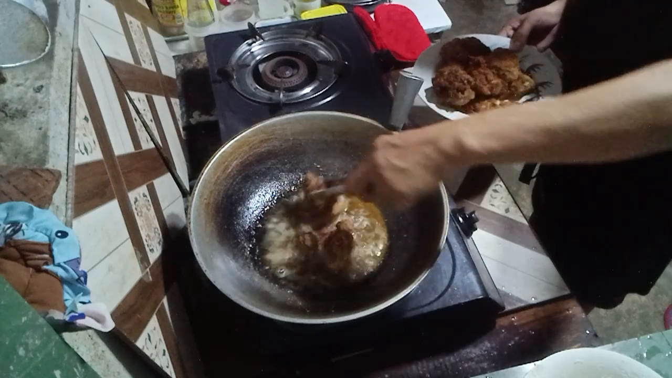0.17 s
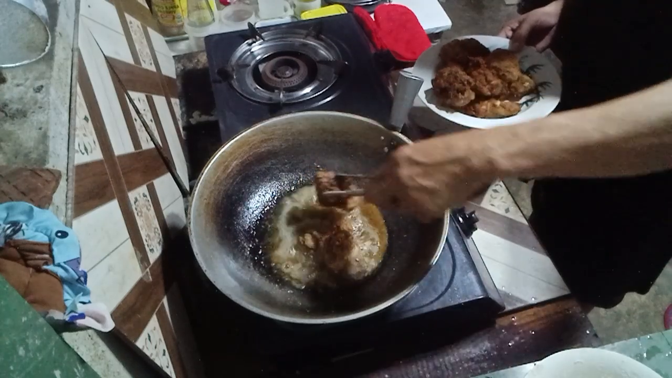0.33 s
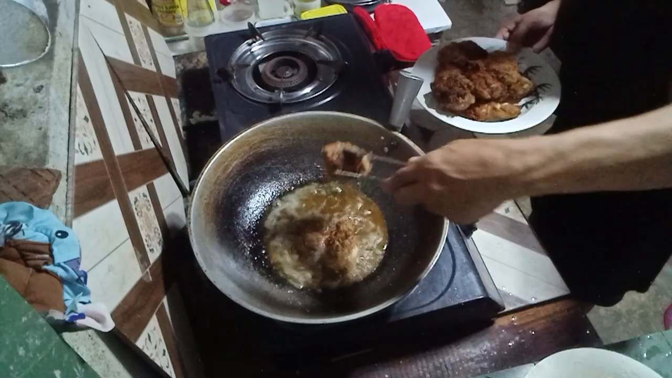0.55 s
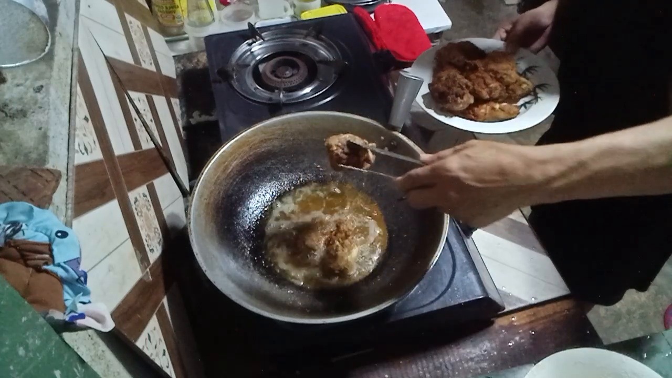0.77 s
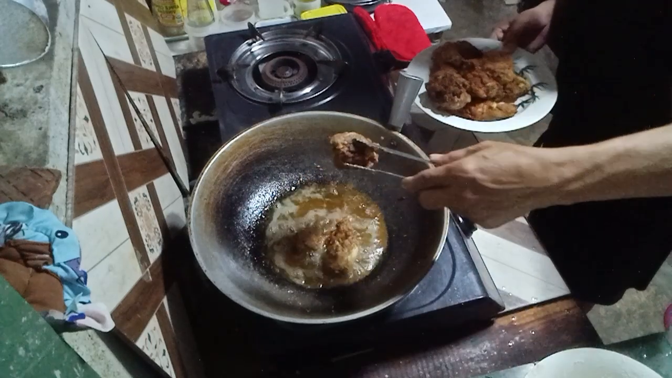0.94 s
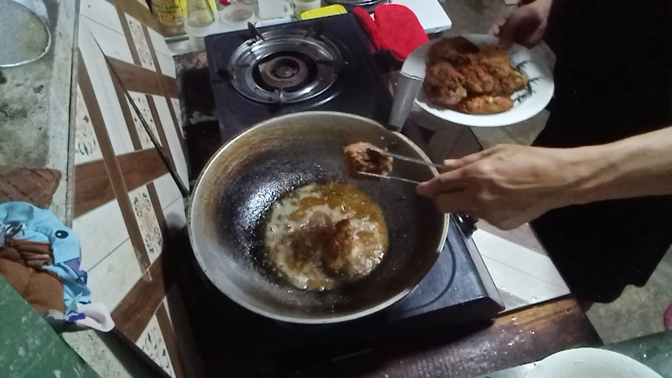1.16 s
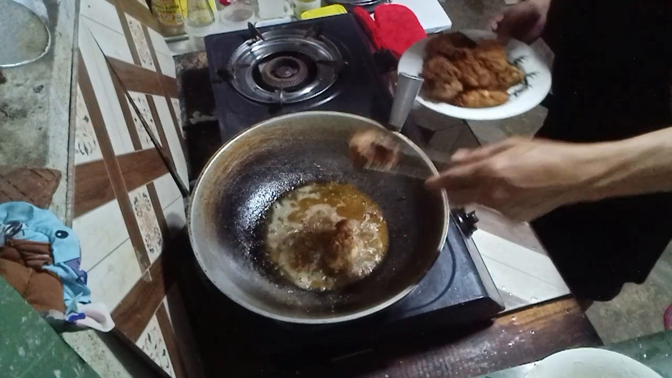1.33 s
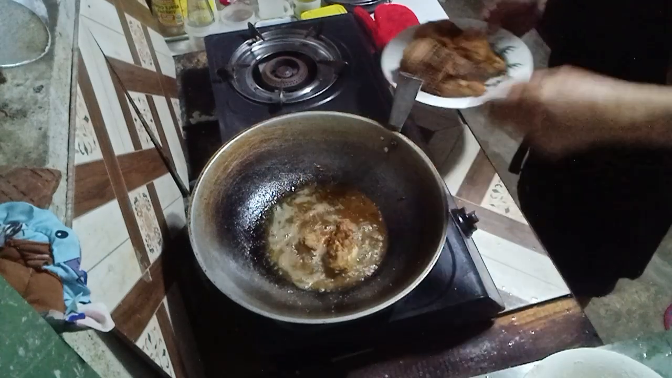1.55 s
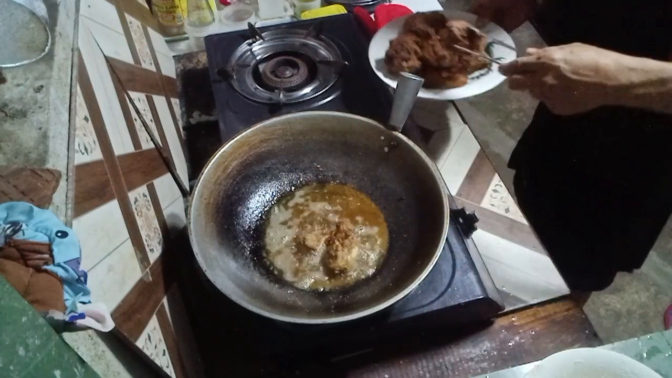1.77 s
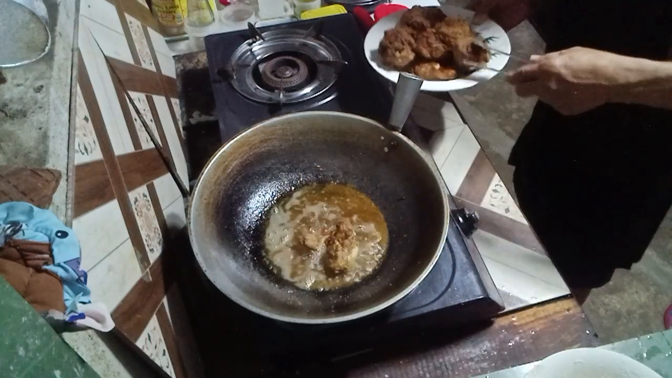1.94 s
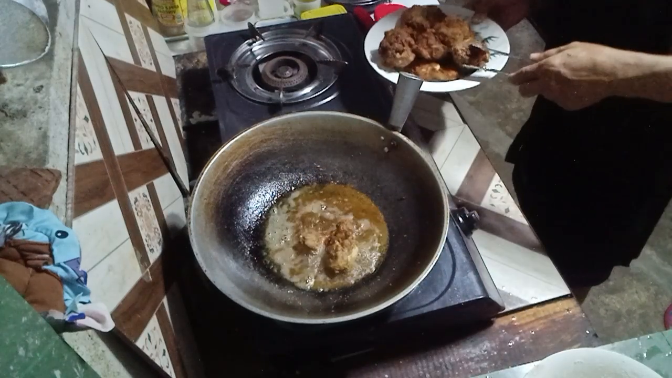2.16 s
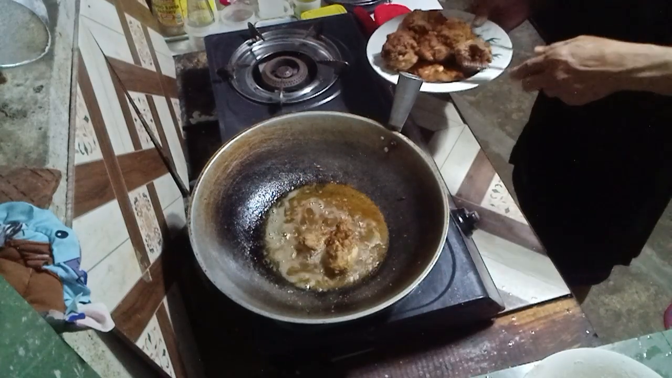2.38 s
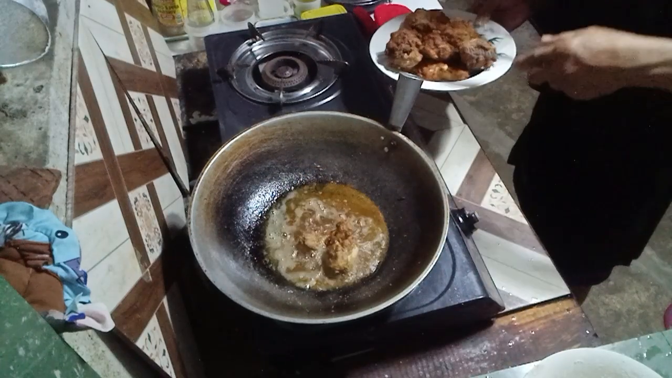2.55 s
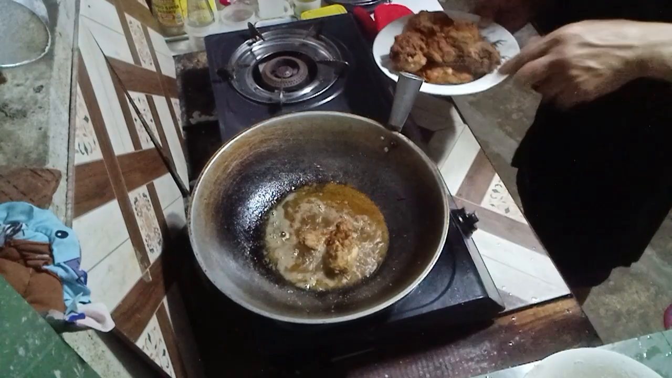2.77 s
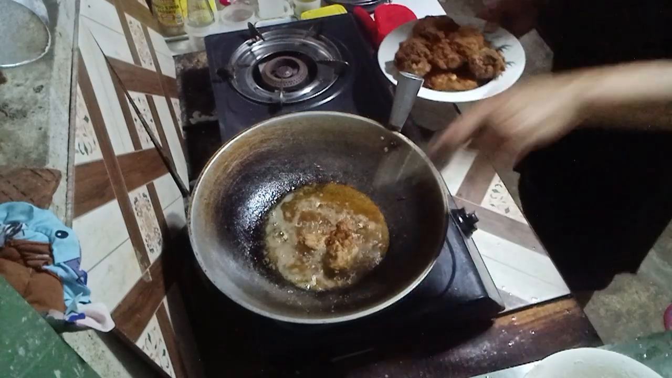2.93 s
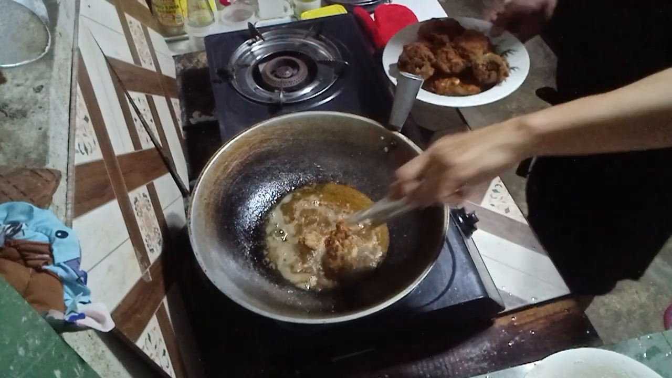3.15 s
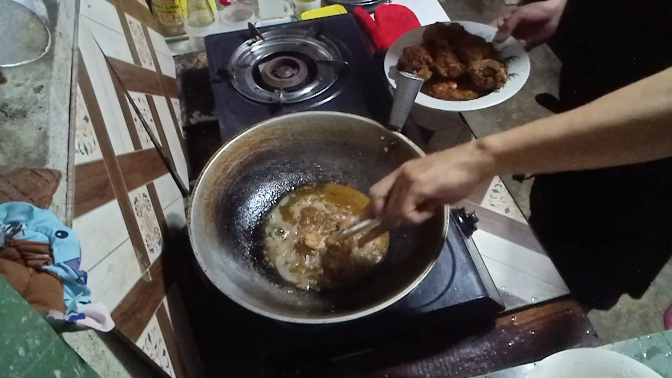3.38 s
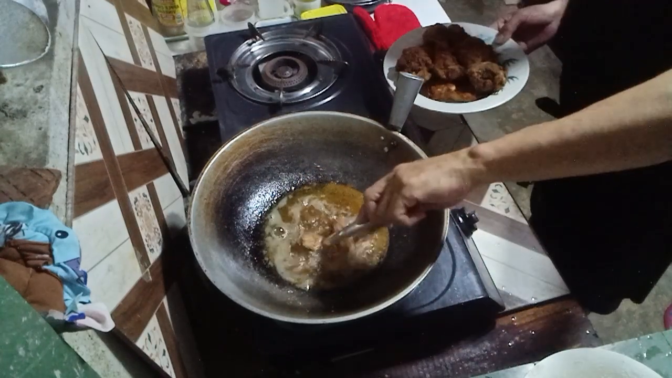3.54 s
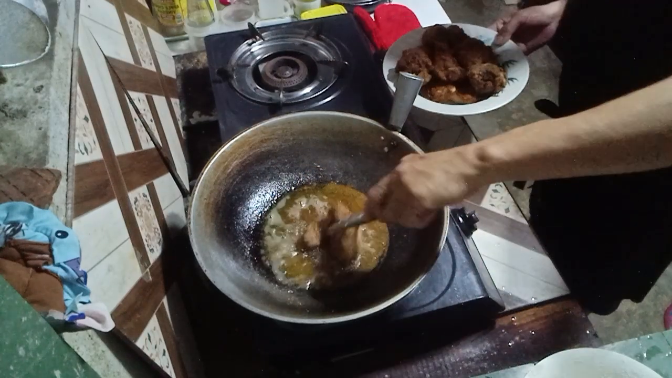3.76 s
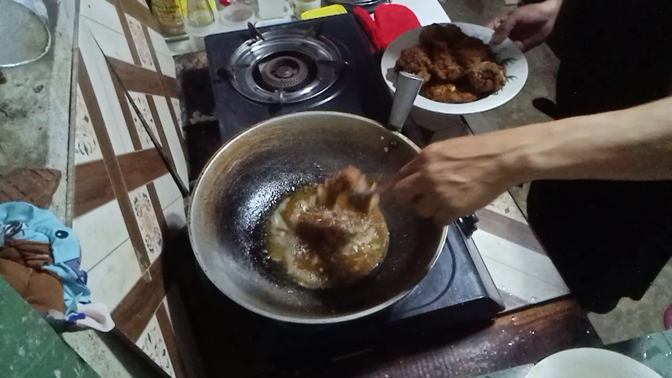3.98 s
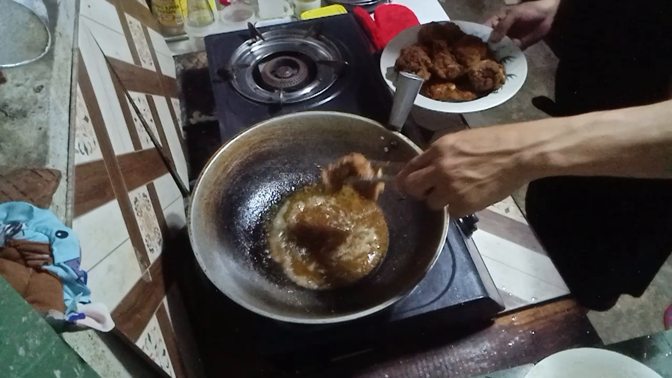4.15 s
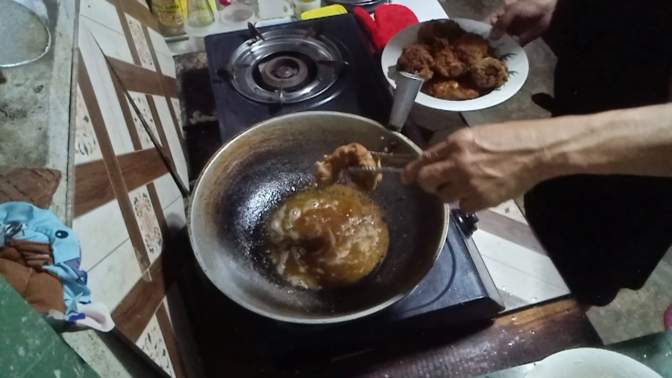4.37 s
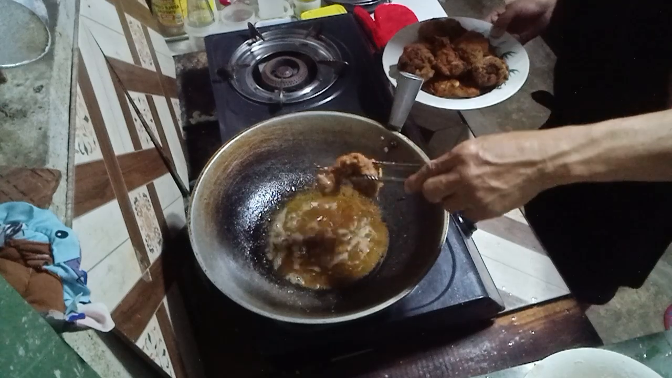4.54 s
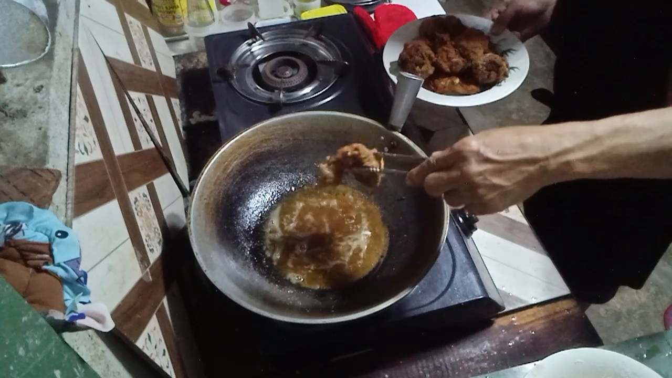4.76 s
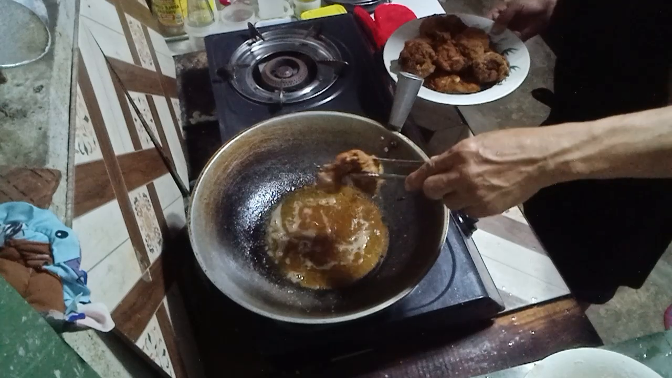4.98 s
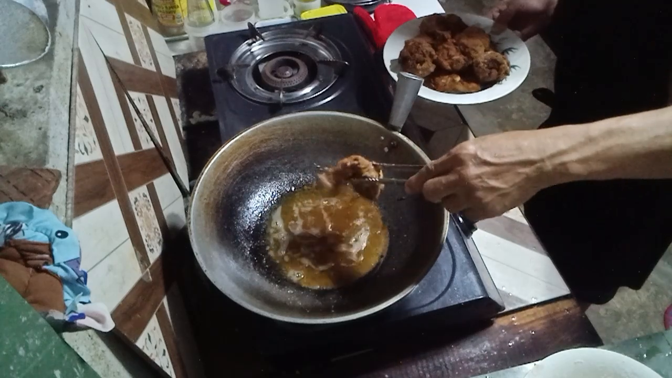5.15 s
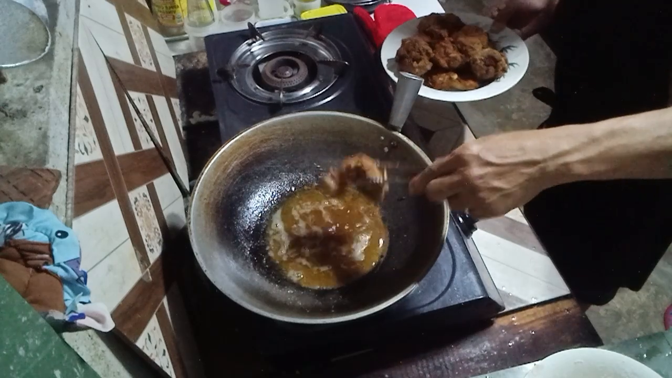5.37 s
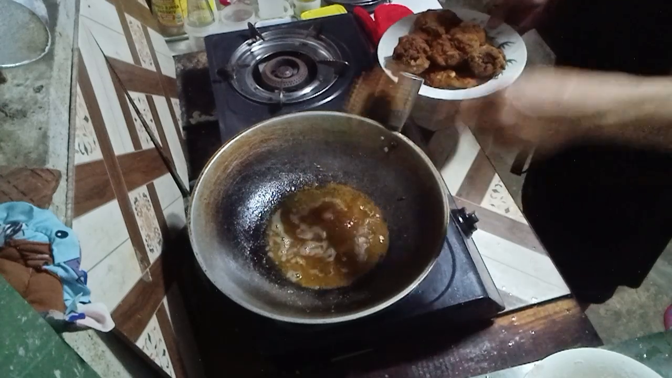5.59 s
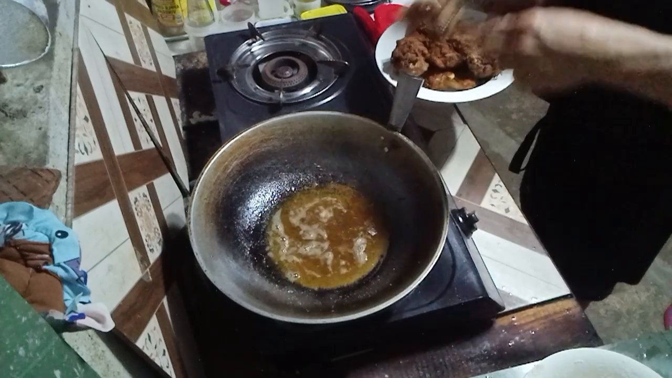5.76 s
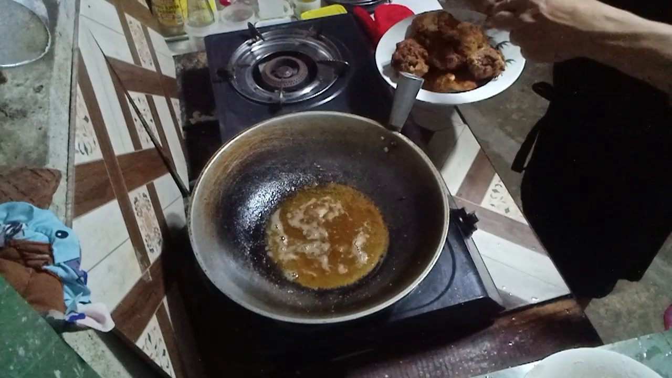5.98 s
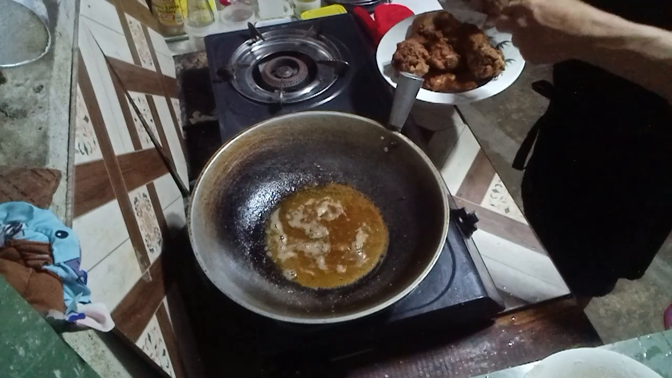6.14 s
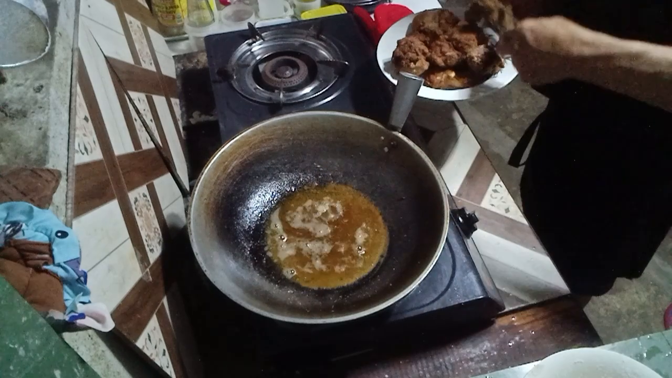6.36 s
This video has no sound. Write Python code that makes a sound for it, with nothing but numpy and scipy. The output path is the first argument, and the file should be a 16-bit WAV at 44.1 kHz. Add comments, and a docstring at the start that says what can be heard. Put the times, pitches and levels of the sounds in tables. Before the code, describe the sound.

From 0 to 0.4 seconds, chicken fries loudly in a wok of hot oil: a dense, bright sizzle with overlapping bursts of sputtering steam. It drops by about 0.6 and keeps easing to 1.5, dotted with ringing bubble pops, high droplet cracks and tiny low gurgles. From 1.5 to 3.4 it holds at a moderate sizzle, with a bubbling surge and steam spurts near 1.9 and a sharp spit near 2.9. At 3.6 to 4.0 it flares again, with hissing, whistling steam and a strong boil. It then fades, with a small gurgle and pops near 4.7 and a cluster of fine crackles from 5.2 to 5.8. By 5.9 only thin fizz and sparse ticks remain until 6.4. A soft, fluttering burner rumble continues beneath. The kitchen echoes very briefly; one close microphone adds faint high hiss, identical in both channels.

```python
"""A dense, bright sizzle of chicken frying in a wok of hot oil; it fades as tongs lift the pieces out one by one.
Small and middling steam bubbles ring as noise-like swarms, and pockets of steam vent and whistle.
Larger bubbles pop, boil and gurgle as ringing sines, and droplets spit with a sharp crack.
The wok and the kitchen echo briefly; the burner rumbles below as low noise.
One microphone, with a faint steady noise of its own at the very top, feeds both channels."""
import sys
import numpy as np
from scipy import signal
from scipy.fft import rfft, irfft, next_fast_len
from scipy.io import wavfile

SR = 44100
rng = np.random.default_rng(int(sys.argv[2]) if len(sys.argv) > 2 else 0)


def dump(signal):
    """Clip the signal to [-1, 1] and save it as 16-bit WAV at the path in sys.argv[1]."""
    limited = np.clip(np.atleast_2d(signal).T, -1, 1)
    pcm = np.round(limited * 32767).astype(np.int16)
    wavfile.write(sys.argv[1], SR, pcm)


N = 283077   # length in samples

# All source levels below are set before the echoes and the microphone's response.


def scene():
    """Mixes the frying with its echoes; gurgles, burner and microphone noise join without echoes."""
    fizz_db, sizzle_db = frying_levels()
    crust = wok(sizzle(sizzle_db) + vents(sizzle_db))
    frying = fizz(fizz_db) + crust + boil(sizzle_db) + pops() + spits(fizz_db)
    mono = kitchen(frying) + gurgles() + burner() + mic_hiss()
    return np.stack([mono, mono])


# How strongly the pan fries over time: t/s, small-bubble fizz level/dB, mid-bubble sizzle level/dB
FRYING_LEVELS = [(0.0, -18.5, -16.5), (0.21, -20.5, -16.5), (0.43, -18, -20.5), (0.57, -21, -22.5),
                 (1.5, -24, -26), (1.88, -23.5, -25), (3.09, -24.5, -26), (3.56, -26.5, -26.5),
                 (3.7, -24.5, -20), (3.91, -29, -19.5), (3.95, -24, -22.5), (4.08, -23.5, -22),
                 (4.3, -26.5, -27), (4.63, -28.5, -28), (4.72, -28.5, -28.5), (4.88, -29, -34.5),
                 (5.3, -35.5, -34), (5.36, -34.5, -32), (5.54, -34.5, -41), (5.58, -31, -33),
                 (5.9, -39.5, -35.5), (6.42, -39, -39.5)]


def frying_levels():
    """The strength of the frying: straight lines in dB between the table's moments."""
    return in_time(FRYING_LEVELS)


# Tone outline of the small bubbles: f/Hz, relative level/dB
FIZZ_TONE = [(2650, -42), (4500, -6), (5300, -5.5), (6600, -4.5), (8340, 1.5), (9300, -3), (12000, -12.5),
             (16000, -14.5)]


def fizz(fizz_db):
    """Small steam bubbles ring high and so often that they blur into a fizz."""
    swarm = bubbles(FIZZ_TONE, (4500, 17000), per_s=9000, spread_db=2.5, cycles=19.7, patchy_db=1.0)
    return from_db(fizz_db) * swarm


# Tone outline of the middling bubbles: f/Hz, relative level/dB
SIZZLE_TONE = [(590, -15.5), (1000, -10.5), (1190, -7.5), (1260, -7), (1350, -7), (1670, 0), (2420, -0.5),
               (2810, -1), (3040, 0.5), (3580, -1), (3920, 3.5), (4350, -3.5), (5200, -9), (6760, 4),
               (11400, -120)]


def sizzle(sizzle_db):
    """Middling steam bubbles are fewer and ring lower than the fizz."""
    swarm = bubbles(SIZZLE_TONE, (1000, 5400), per_s=6000, spread_db=3.0, cycles=11.0, patchy_db=1.0)
    return from_db(sizzle_db) * swarm


def bubbles(tone, span_hz, per_s, spread_db, cycles, patchy_db, count=20):
    """Random uneven bursts; each bubble size rings at its own pitch; neighbouring sizes swell partly together."""
    sizes = from_db(spread_db * np.minimum(rng.exponential(1, N), 5)) * rng.choice([-1, 1], N)
    together = .3 * drift(20)
    chance, dealt = rng.random(N), rng.integers(0, count, N)
    swarms = [drift(18.5) for k in range(count + 1)]
    out = 0
    for k, hz in enumerate(np.geomspace(*span_hz, count)):
        # Neighbouring sizes share one drift, and all sizes share the weaker common one.
        swarm = from_db(patchy_db * (together + swarms[k] + swarms[k + 1]))
        bursts = sizes * (chance < per_s / SR) * (dealt == k)
        rung = rms_one(ring(bursts, hz, cycles / hz))   # rings die away by 60 dB in this many cycles
        out = out + swarm * rung * np.sqrt(hz)          # wider bands up high carry more power
    return rms_one(colour(out, tone))


# Loudest steam pockets venting through the crust: t/s, level/dB (rms before opening and closing), f/Hz, length/s
LOUD_VENTS = [(0.065, -22.5, 1810, 0.046), (0.098, -19, 1590, 0.066), (0.116, -17, 2060, 0.03),
              (0.15, -19.5, 1550, 0.052), (0.209, -21.5, 1570, 0.058), (0.167, -19, 3600, 0.048),
              (0.268, -18.5, 2430, 0.084), (0.608, -30.5, 1790, 0.073), (0.638, -28.5, 1270, 0.041),
              (0.669, -20.5, 3680, 0.056), (0.788, -22.5, 3870, 0.049), (1.151, -27, 1750, 0.031),
              (1.312, -22, 3720, 0.033), (1.336, -27, 1660, 0.062), (1.414, -24.5, 2830, 0.063),
              (1.56, -25, 3070, 0.058), (1.925, -23, 1820, 0.091), (1.927, -18, 2640, 0.04),
              (1.96, -19.5, 1800, 0.046), (2.051, -22.5, 1740, 0.049), (2.332, -25, 2800, 0.045),
              (2.599, -20.5, 1820, 0.049), (2.635, -19, 2900, 0.045), (2.809, -25, 3380, 0.086),
              (2.943, -29, 3850, 0.04), (3.055, -31, 3870, 0.065), (3.165, -31, 3980, 0.044),
              (3.285, -26, 2710, 0.046), (3.4, -22.5, 2800, 0.035), (3.48, -31, 3900, 0.035),
              (3.593, -24, 1960, 0.1), (3.664, -18, 3260, 0.089), (3.674, -24, 1750, 0.063),
              (3.7, -19, 2300, 0.065), (3.705, -20, 3950, 0.1), (3.782, -21, 3830, 0.159),
              (3.788, -18, 3370, 0.07), (3.895, -18.5, 3160, 0.056), (3.975, -24, 2400, 0.055),
              (4.025, -25, 3040, 0.13), (4.029, -26, 1330, 0.059), (4.047, -28, 1670, 0.05),
              (4.177, -18, 3080, 0.033), (4.266, -27.5, 2980, 0.079), (4.406, -23, 3000, 0.033),
              (4.436, -28, 4000, 0.056), (4.641, -21.5, 1670, 0.044), (4.667, -33, 1430, 0.055),
              (4.694, -27.5, 3800, 0.06), (4.757, -26, 3990, 0.083), (4.88, -27.5, 1850, 0.062),
              (5.12, -32, 1720, 0.038), (5.169, -30.5, 2940, 0.048), (5.205, -30, 4300, 0.052),
              (5.341, -29.5, 4100, 0.046), (5.369, -32, 1940, 0.051), (5.431, -30.5, 1680, 0.07),
              (5.557, -29.5, 1500, 0.044), (5.558, -31.5, 4000, 0.045), (5.561, -35, 4730, 0.06),
              (5.622, -31, 1780, 0.059), (5.649, -31.5, 2830, 0.04), (5.745, -38, 4260, 0.035),
              (6.026, -35, 5320, 0.035), (6.134, -33.5, 5930, 0.05), (6.295, -34.5, 3980, 0.035),
              (6.299, -28, 2860, 0.022), (6.344, -40, 1370, 0.072), (6.388, -34.5, 1970, 0.038)]
# Narrow cracks whistling, with the same columns: t/s, level/dB, f/Hz, length/s
WHISTLES_OF_STEAM = [(1.093, -24.5, 3960, 0.082), (2.24, -25.5, 3970, 0.092), (3.06, -32, 1280, 0.062),
                     (3.827, -21.5, 2350, 0.125), (3.84, -27.5, 1730, 0.11), (5.912, -32.5, 4570, 0.11),
                     (5.934, -40, 3950, 0.085), (6.19, -38, 4750, 0.045)]
WHISTLE_WIDTH_HZ = 200
VENT_WIDTH_HZ, VENT_USUAL_HZ, VENT_USUAL_S = 505, 2500, 0.051   # resonance width at usual pitch and length
NARROWING, WIDENING = 0.52, 0.53   # longer pockets whistle more purely; higher ones are broader
SMALL_VENTS, SMALL_VENT_DB = 40, -4   # how many at random; middle level against the sizzle
SMALL_VENT_HZ, SMALL_VENT_S = (1404, 4950), (.025, 0.063)   # ranges of pitch and length


def vents(sizzle_db):
    """A steam pocket tears open and sputters at its cavity's pitch until it closes; small ones come at random."""
    s, db, pitch, size = scattered(sizzle_db + SMALL_VENT_DB, count=SMALL_VENTS)
    (low_hz, high_hz), (short, long) = SMALL_VENT_HZ, SMALL_VENT_S
    small = zip(s, db, low_hz * (high_hz / low_hz) ** pitch, short + (long - short) * size)
    pockets = list(small) + list(LOUD_VENTS)
    widths_hz = [VENT_WIDTH_HZ * (VENT_USUAL_S / length) ** NARROWING * (hz / VENT_USUAL_HZ) ** WIDENING
                 for s, db, hz, length in pockets]
    widths_hz += [WHISTLE_WIDTH_HZ] * len(WHISTLES_OF_STEAM)
    events = pockets + list(WHISTLES_OF_STEAM)
    out, t = np.zeros(N), np.arange(round(.2 * SR)) / SR
    noises = rng.standard_normal((len(events), len(t)))
    spurts = rng.exponential(1, (len(events), len(t)))
    for (s, db, hz, length), width_hz, noise, spurt in zip(events, widths_hz, noises, spurts):
        opening = np.clip(t / 0.0022, 0, 1) * np.exp(-t / 0.21)
        closing = np.clip((length - t) / 0.029, 0, 1)
        t60 = np.log(1000) / (np.pi * width_hz)      # a narrower resonance rings longer
        steam = noise * from_db(3.0 * spurt)         # steam comes in uneven spurts
        hiss = ring(ring(steam, hz, t60), hz, t60)
        add(out, s, from_db(db) * rms_one(hiss) * opening * closing)
    return out


# Modes of the wok that colour the sizzle: f/Hz, width/Hz, lift level/dB (negative is a cut)
WOK_MODES = [(1272, 63, 5.5), (1439, 36, 3), (1550, 51, 2.5), (1666, 41, 1), (1810, 34, 1), (2357, 40, 1.5),
             (2940, 27, -1), (3260, 21, -5.5), (3500, 22, -13), (3660, 35, 0), (3720, 60, -2.5),
             (4793, 61, 5)]


def wok(x):
    """Each mode of the steel bowl lifts or weakens a narrow band."""
    for hz, width_hz, lift_db in WOK_MODES:
        r, w = np.exp(-np.pi * width_hz / SR), 2 * np.pi * hz / SR
        top, bottom = [(1 - r * r) / 2, 0, (r * r - 1) / 2], [1, -2 * r * np.cos(w), r * r]
        x = x + (from_db(lift_db) - 1) * signal.lfilter(top, bottom, x)
    return x


# Loudest large bubbles bursting: t/s, ring level/dB, f/Hz
LOUD_POPS = [(0.0964, -23, 1550), (0.517, -3, 3760), (0.659, -10, 3820), (0.9921, -2, 4870),
             (1.2938, -6.5, 2610), (1.4462, -12, 2890), (1.5465, -15, 2410), (1.571, -8, 3020),
             (1.6489, -10, 1790), (1.7688, -7, 1720), (1.924, -6, 1700), (2.182, -22, 1880),
             (2.3256, -2.5, 3970), (2.6409, -12, 2870), (3.3535, -9, 2350), (3.4015, -9, 2860),
             (3.49, -4.5, 3900), (3.871, -6, 2350), (3.9025, -4, 3200), (3.9774, -8, 2400),
             (4.6464, -5, 1800), (4.6715, -14, 1660), (4.8843, -14, 1950), (5.208, -9, 3870),
             (5.3453, -16, 4200), (5.3697, -15, 1930), (5.4277, -14, 1550), (5.626, -31, 1600),
             (5.9284, -13, 4450)]


def pops():
    """A large bubble bursts and rings briefly at its own pitch."""
    return clicks(LOUD_POPS, cycles=11)


# Loudest droplets spitting: t/s, ring level/dB
LOUD_SPITS = [(1.4748, -12), (1.8878, -5), (2.008, -13), (2.2475, -10), (2.4455, -5.5), (2.8761, -1),
              (3.1235, -11), (3.1754, -9), (3.3495, -11), (3.4438, -22), (3.5101, -16), (3.5321, -10),
              (3.5685, -4), (4.6231, -18), (4.9484, -13), (5.1459, -14), (5.2187, -22), (5.345, -16),
              (5.3829, -14.5), (5.4248, -10.5), (5.5485, -20), (5.5789, -20), (5.6079, -18), (5.6637, -17),
              (5.6996, -10), (5.783, -15), (5.8388, -14), (5.8927, -24), (6.0773, -18), (6.2489, -19)]
SPIT_HZ, SPIT_SCATTER_HZ = 8440, 400
CRACK_DB = -3   # the crack of a droplet against its ring
SMALL_SPITS, SMALL_SPIT_DB = 140, 8   # how many at random; middle level against the fizz


def spits(fizz_db):
    """Droplets of similar size spit: a ring and its sharp crack; small ones come at random."""
    s, db, *_ = scattered(fizz_db + SMALL_SPIT_DB, count=SMALL_SPITS)
    rows = list(zip(s, db)) + list(LOUD_SPITS)
    offsets = rng.standard_normal(len(rows))
    drops = [(s, db, SPIT_HZ + SPIT_SCATTER_HZ * off) for (s, db), off in zip(rows, offsets)]
    return clicks(drops, cycles=37.0) + from_db(CRACK_DB) * clicks(drops, cycles=3.8)


def clicks(events, cycles):
    """Single bursts: a click rings at its pitch and dies away by 60 dB in the given cycles."""
    out, click = np.zeros(N), np.arange(600) == 0
    for s, db, hz in events:
        add(out, s, from_db(db) * ring(click, hz, cycles / hz))
    return out


SMALL_SPREAD_DB = 4   # scatter of the small spits and vents


def scattered(level_db, count):
    """Random moments with levels scattered about the frying there: times, levels and two random shares."""
    share, first, second = rng.random((count, 3)).T
    at = (share * (N - 1)).astype(int)
    return at / SR, level_db[at] + SMALL_SPREAD_DB * rng.standard_normal(count), first, second


# Tone outline of the large bubbles: f/Hz, relative level/dB
BOIL_TONE = [(150, -32), (260, -21), (295, -8.5), (376, -5), (467, -2.5), (527, 5.5), (584, -1.5),
             (663, -4.5), (717, 5), (885, -4), (1100, 1.5), (1430, -21), (2420, -120)]
BOIL_DB, BOIL_FOLLOWS = -44, 0.29   # level at mean sizzle, before surges; share of the sizzle's swing


def boil(sizzle_db):
    """Large bubbles ring low, partly follow the sizzle and well up in surges."""
    boil_db = BOIL_DB + BOIL_FOLLOWS * (sizzle_db - sizzle_db.mean()) + surges()
    swarm = bubbles(BOIL_TONE, (260, 1100), per_s=1500, spread_db=3.0, cycles=14.0, patchy_db=1.2)
    return from_db(boil_db) * swarm


# Moments when the boil wells up: t/s, lift level/dB (negative is a dip)
BOIL_SURGES = [(0.06, 6.5), (0.16, 4.5), (0.61, 8), (1.69, 8.5), (1.92, 12), (2.06, 8.5), (2.35, 7),
               (3.19, 10.5), (3.65, 14.5), (4.04, 8), (4.65, -5), (5.3, 5)]
SURGE_RISE_S, SURGE_FALL_S = 0.024, 0.081   # time constants


def surges():
    """Change of the boil in dB: each one builds quickly and dies away more slowly; overlapping ones add."""
    t = np.arange(N) / SR
    return sum(db * np.exp(np.minimum((t - s) / SURGE_RISE_S, (s - t) / SURGE_FALL_S))
               for s, db in BOIL_SURGES)


# Cavities in the oil gurgling round the pieces:
# t/s, level/dB (peak before wavering), start f/Hz, end f/Hz, length/s
OIL_GURGLES = [(.17, -28, 522, 540, 0.032), (.545, -35, 380, 437, 0.13), (0.604, -28, 640, 800, 0.019),
               (.83, -33.5, 177, 179, 0.097), (3.05, -34.5, 518, 536, 0.067), (3.42, -37.5, 535, 523, 0.13),
               (3.62, -31.5, 320, 345, 0.041), (3.667, -30.5, 715, 754, 0.072),
               (4.028, -39, 411, 454, 0.11), (4.64, -40, 530, 525, 0.045), (4.68, -37.5, 148, 154, 0.13),
               (4.77, -29, 150.5, 160, 0.09), (5.262, -30, 348, 429, 0.069), (5.29, -30, 532, 523, 0.052),
               (5.323, -34.5, 468, 397, 0.075), (5.58, -33, 977, 993, 0.046)]


def gurgles():
    """A large cavity rings as it changes size, gliding in pitch and wavering in strength."""
    out, waver = np.zeros(N), from_db(2.5 * drift(30))
    for s, db, start_hz, end_hz, length in OIL_GURGLES:
        share = np.arange(round(length * SR)) / (length * SR)
        turn = 2 * np.pi * np.cumsum(start_hz + (end_hz - start_hz) * share) / SR
        swell = np.sin(np.pi * share ** 0.76) ** 0.38
        add(out, s, from_db(db) * swell * np.sin(turn))
    return out * waver


# Tone outline of the burner's rumble: f/Hz, relative level/dB
BURNER_TONE = [(15, -54), (25, -28), (32, -27), (59, -9), (76, 1.5), (113, -5), (162, 4.5), (183, 0.5),
               (205, -3), (270, -10), (290, -27), (380, -44), (640, -120)]
# Strength of the flame, before its random flutter: t/s, rumble level/dB
FLAME_LEVELS = [(0.0, -47.5), (0.39, -44.5), (2.16, -42), (3.95, -45.5), (4.27, -46.5), (4.63, -43),
                (5.18, -47.5), (6.42, -45)]


def burner():
    """The flame rumbles: low noise whose level flutters by chance."""
    rumble = rms_one(colour(rng.standard_normal(N), BURNER_TONE))
    return from_db(in_time(FLAME_LEVELS)[0] + 1.55 * drift(7.3)) * rumble


ECHO_T60_S, ECHO_DB = 0.15, -4.5   # time to die away by 60 dB; echoes against direct sound


def kitchen(x, count=4):
    """Direct sound plus dense echoes of wok and walls; bursts wander between places that echo differently."""
    t = np.arange(round(.3 * SR)) / SR
    shares = np.array([drift(5.43) for k in range(count)])
    shares /= np.linalg.norm(shares, axis=0)
    fading = from_db(-60 * t / ECHO_T60_S) * (1 - np.exp(-t / 0.00017))
    tails = rng.standard_normal((count, len(t))) * fading
    echoes = sum(signal.fftconvolve(x * share, tail / np.linalg.norm(tail))[:N]
                 for share, tail in zip(shares, tails))
    return (x + from_db(ECHO_DB) * echoes) / np.hypot(1, from_db(ECHO_DB))


MIC_HISS_DB = -49


def mic_hiss():
    """Faint steady noise of the microphone at the very top: noise with everything low taken out."""
    high_pass = signal.butter(4, 9500, "high", fs=SR, output="sos")
    return from_db(MIC_HISS_DB) * rms_one(signal.sosfilt(high_pass, rng.standard_normal(N)))


# How well the microphone hears each pitch: f/Hz, level/dB
MICROPHONE_RESPONSE = [(20, -19), (55, -0.5), (9300, 0.5), (9800, -15.5), (10500, -9.5), (10850, -15.5),
                       (11450, -7), (12000, -28), (12800, -18), (13600, -11.5), (14300, -37), (14600, -32),
                       (15050, -41), (15480, -12)]
CUTOFF_HZ = 15490


def record(dry):
    """One microphone, weak in the deep bass and the upper treble; the very top is cut steeply."""
    heard = colour(dry[0], MICROPHONE_RESPONSE)
    heard = signal.sosfilt(signal.ellip(12, .5, 80, CUTOFF_HZ, fs=SR, output="sos"), heard)
    return np.stack([heard, heard])


def ring(x, hz, t60):
    """A damped resonator: a unit click sets a sine ringing from height 1, down 60 dB after t60 seconds."""
    r, w = from_db(-60 / (t60 * SR)), 2 * np.pi * min(hz, .45 * SR) / SR
    return signal.lfilter([0, np.sin(w)], [1, -2 * r * np.cos(w), r * r], x + 1e-18)


def drift(rate):
    """Slow chance: noise through two one-pole low-passes at rate Hz, with a spread of 1."""
    r = np.exp(-80 * np.pi * rate / SR)   # made at one value per 40 samples
    noise = rng.standard_normal(N // 40 + 2002)
    slow = signal.lfilter([1], [1, -2 * r, r * r], noise)[2000:]   # skips the filter's start
    return np.interp(np.arange(N) / 40, np.arange(len(slow)), rms_one(slow))


def colour(x, outline):
    """Filters a sound by an outline of f/Hz and level/dB, straight between points on a log pitch scale."""
    hz, db = np.transpose(outline)
    size = next_fast_len(N)
    bins = np.maximum(np.fft.rfftfreq(size, 1 / SR), 1)
    gain = from_db(np.interp(np.log(bins), np.log(hz), db))
    return irfft(rfft(x, size) * gain, size)[:N]


def in_time(rows):
    """Turns rows of a time and levels into one curve per level column, in straight lines between the rows."""
    s, *columns = np.transpose(rows)
    return [np.interp(np.arange(N) / SR, s, c) for c in columns]


def add(out, s, x):
    """Mixes a short sound in at s seconds."""
    at = round(s * SR)
    out[at:at + len(x)] += x[:N - at]


def from_db(db):
    """Decibels to a plain amplitude factor."""
    return 10 ** (np.asarray(db) / 20)


def rms_one(x):
    """Scales a sound to an rms of 1."""
    return x / np.sqrt(np.mean(x ** 2) + 1e-20)


dry = scene()
out = record(dry)
dump(out)
```